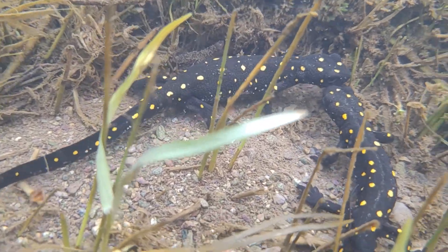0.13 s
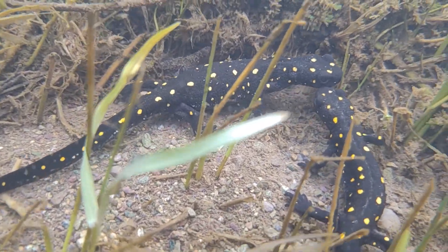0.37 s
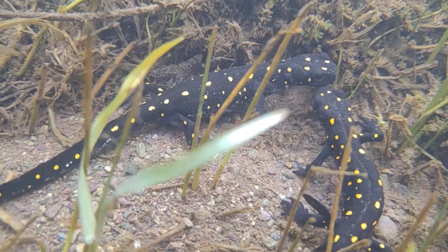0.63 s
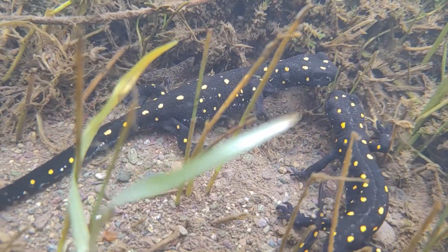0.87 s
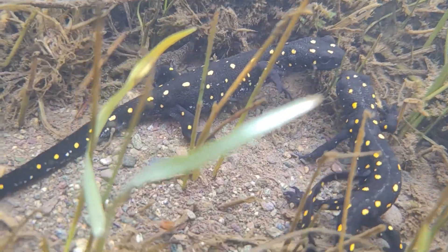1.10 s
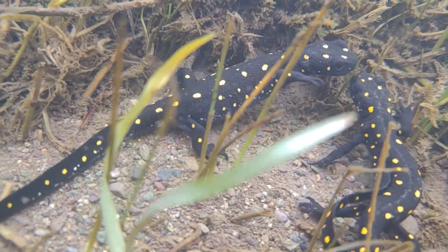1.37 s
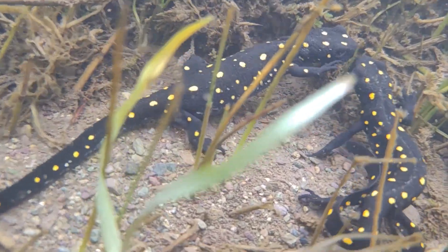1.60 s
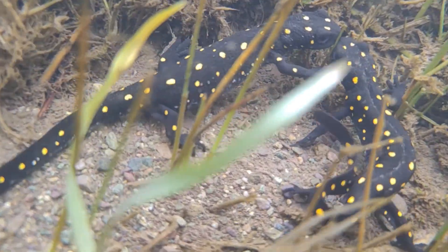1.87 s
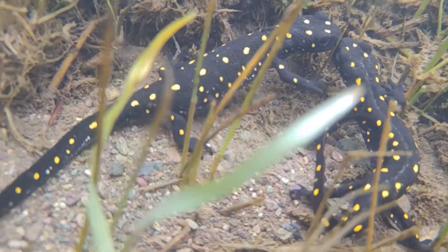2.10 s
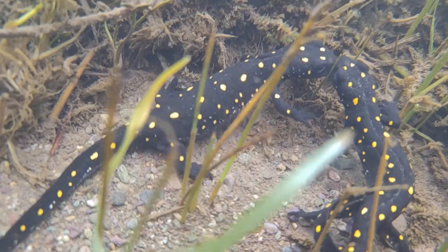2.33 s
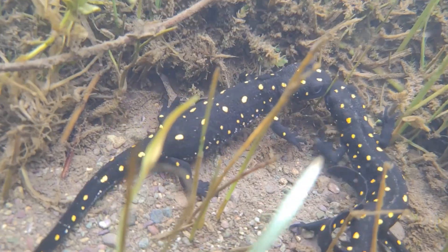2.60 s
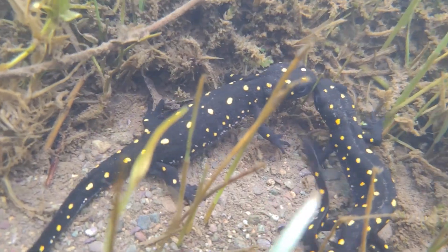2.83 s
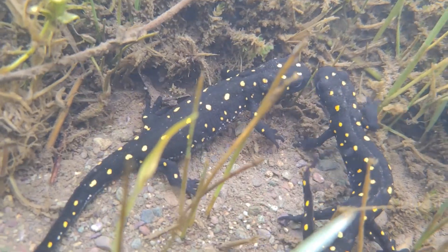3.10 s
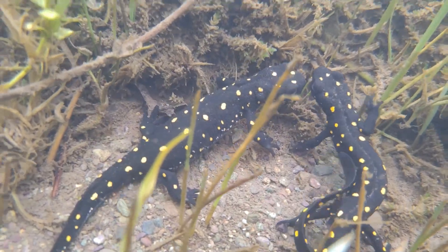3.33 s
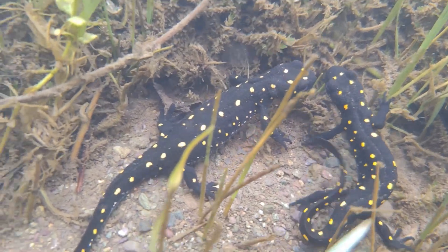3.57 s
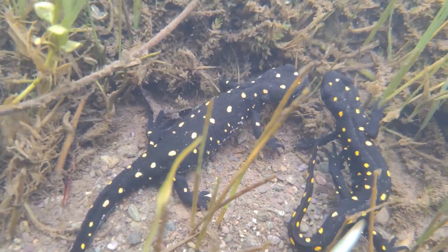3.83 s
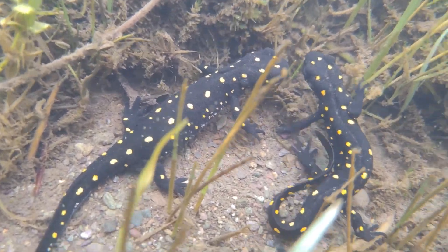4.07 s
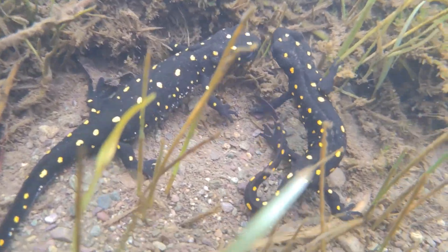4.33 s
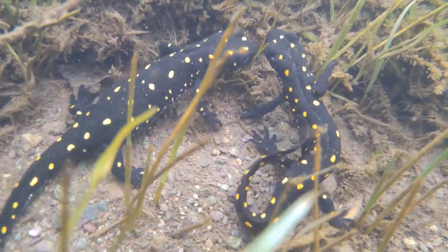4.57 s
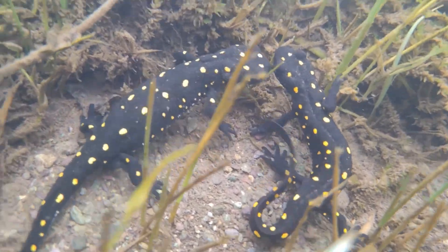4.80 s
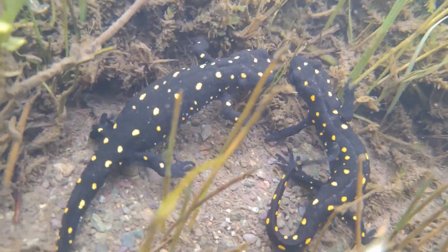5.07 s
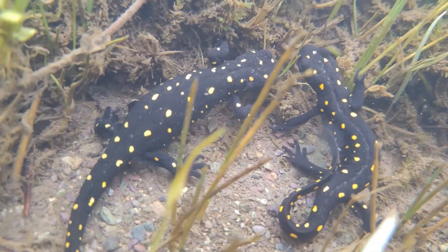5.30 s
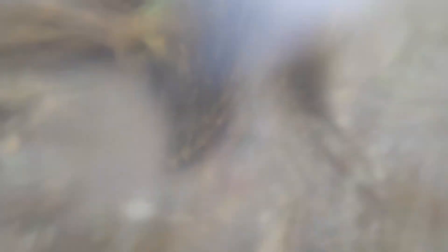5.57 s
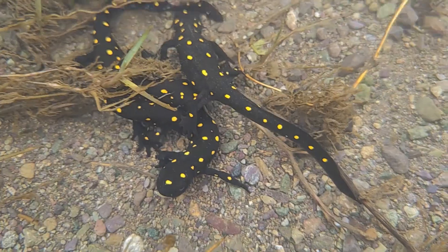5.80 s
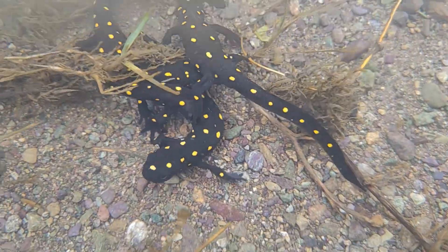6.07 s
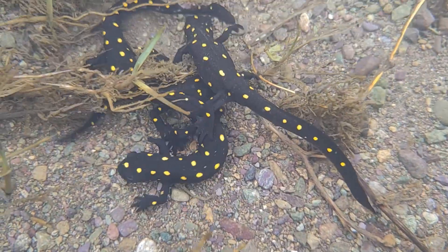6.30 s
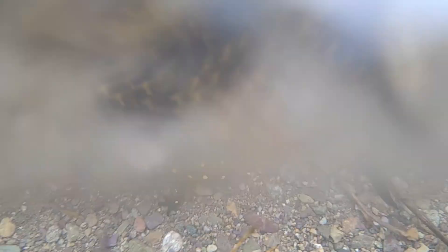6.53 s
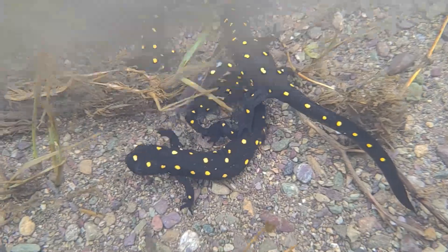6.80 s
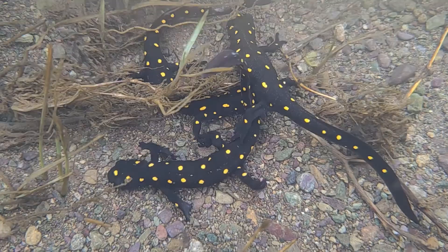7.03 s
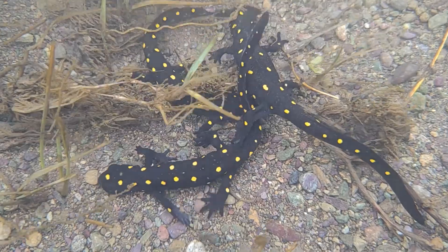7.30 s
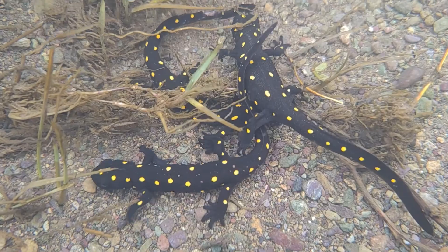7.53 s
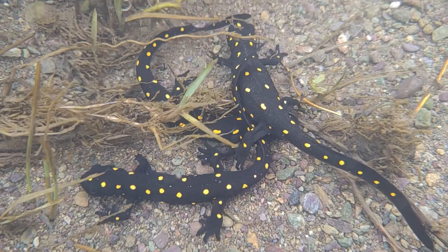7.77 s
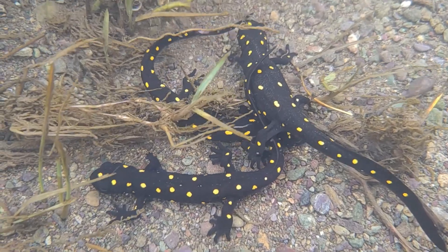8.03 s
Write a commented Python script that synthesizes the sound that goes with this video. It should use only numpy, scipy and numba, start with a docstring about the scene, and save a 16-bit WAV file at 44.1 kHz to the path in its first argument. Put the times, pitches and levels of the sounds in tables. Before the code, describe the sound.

Two underwater passages, heard from inside a small casing in a stream. From 0 to 5.4 seconds it is muffled and dark: slow sloshing pressure, a rough wavering low hum swelling in irregular bumps, and very faint far water. Tiny grit ticks and light bubble pops scatter around 0.3 to 1.4; a hard clack with a knock lands at 1.7. After a quieter stretch, small pops and ticks gather at 3.2, faint weed brushing follows from 3.4, and the loudest sharp clacks and hollow knocks strike between 3.6 and 4.1. It then settles to hum and small blips. At 5.4 a quick fade through silence opens onto a brighter, steady, dense rush and hollow gurgle, surging near 6.2 and 7.0, with constant round bubble plops, crisp ticks and dull knocks. It eases slightly toward 8.1 seconds while a low wash grows from about 7.4.

```python
"""A small camera lies under a shallow stream, first deep in weed: the current slosh rocks its mount, two low
modes of which hum as noisy, wavering sines, over faint far water. Grit ticks on the casing, knocks ring the body,
a few bubbles pop as fading sines, and weed brushes past as filtered noise. After a short fade through silence
the camera lies just below the surface: a dense rush and gurgle of bubbles rings the casing, whose modes
reach the two microphones differently, while ticks, knocks and pops go on over a low wash."""
import sys
import numpy as np
from scipy import signal
from scipy.fft import rfft, irfft, next_fast_len
from scipy.io import wavfile
from scipy.ndimage import uniform_filter1d
from numba import njit

SR = 44100
rng = np.random.default_rng(int(sys.argv[2]) if len(sys.argv) > 2 else 0)


def wav_out(sig):
    """Save sig, one row per channel (or a flat mono array), as 16-bit PCM at SR to the path in sys.argv[1]."""
    wavfile.write(sys.argv[1], SR, np.round(np.clip(np.atleast_2d(sig).T, -1, 1) * 32767).astype(np.int16))


def ratio(d):
    """dB to gain"""
    e = np.asarray(d, float) / 20
    return 10 ** e


N = 359415
TIME_S = np.arange(N) / SR

# Strength of the shallow flow past the casing. Each row: time in seconds, level of the rush in dB.
FLOW = [(5.45, -34), (5.62, -33), (5.8, -36), (6.05, -34.5), (6.15, -30.5), (6.2, -38), (6.3, -35),
        (6.43, -39), (6.66, -37.5), (6.84, -38.5), (6.92, -32.5), (7.08, -33), (7.3, -34), (7.52, -37),
        (7.8, -38.5), (7.97, -37), (8.15, -40.5)]
# Casing resonances. Each row: frequency in Hz, width in Hz, left gain in dB, right gain in dB,
# lag of the right microphone in radians.
CASING_MODES = [(304, 280, -17, -0.5, 0.93), (477, 73, 4, 5.5, -0.13), (600, 170, 8.5, 3, 0.05),
                (944, 140, -1.5, 5.5, -2.5), (1150, 30, -5, 5, 2.5), (1450, 130, -1, -2.5, -0.5),
                (1860, 250, -17, 4.5, 0.32), (2120, 340, -11.5, 4.5, 0.21), (2648, 170, 6.5, 1, -1.5),
                (3460, 2500, -6.5, -8.5, 4), (4000, 51, 4.5, 0, 4), (4830, 180, 2.5, -15, 1.5),
                (5315, 240, 3.5, -5, 2), (6090, 110, -10.5, 9, 5), (6800, 1300, -1, 9.5, 3.5)]
# Spectrum of the far murmur. Each row: frequency in Hz, relative level in dB.
MURMUR_COLOUR = [(170, -10.5), (240, -1.5), (330, -4), (450, -1), (570, 3.5), (680, -7), (800, -15.5),
                 (1100, -35.5)]
# Spectrum of the far fizz before the casing. Each row: frequency in Hz, relative level in dB.
FIZZ_COLOUR = [(600, -14), (850, -3), (1150, -8), (1480, -4), (1800, -13.5), (3200, -8), (6800, -23.5),
               (8000, -47.5), (9500, -30.5), (12200, -15.5), (15500, -35.5)]
# Spectrum of the gurgle before the casing. Each row: frequency in Hz, relative level in dB.
GURGLE_COLOUR = [(250, -6.5), (400, -2.5), (520, -0.5), (700, -4.5), (1000, -7), (1400, -36)]
# Spectrum of the rush before the casing. Each row: frequency in Hz, relative level in dB.
RUSH_COLOUR = [(600, 1), (900, -10.5), (1200, -11.5), (1500, -12.5), (2100, -2.5), (3200, -9.5),
               (5400, -15), (7000, -27.5), (8300, -54), (9700, -34.5), (12000, -31.5), (15500, -44)]
# Spectrum of the low wash. Each row: frequency in Hz, relative level in dB.
WASH_COLOUR = [(40, -14), (70, -3.5), (130, -8), (250, -5), (400, -14.5), (600, -36.5)]
# Spectrum of the deep slosh. Each row: frequency in Hz, relative level in dB.
SLOSH_COLOUR = [(4, -30.5), (8, 14), (18, -4), (28, -8), (50, -6), (75, -6.5), (130, -19), (250, -47.5)]
# Spectrum of the shallow swell. Each row: frequency in Hz, relative level in dB.
SWELL_COLOUR = [(4, -28.5), (8, 9), (22, 6.5), (38, -11.5), (70, -15.5), (130, -37.5), (250, -42.5)]
# Spectrum of the noise that roughens the sway. Each row: frequency in Hz, relative level in dB.
RUMBLE_COLOUR = [(45, -19), (70, -3.5), (95, 2.5), (125, 0), (150, -18.5), (230, -28)]
# Looseness of the mount around its upper mode. Each row: frequency in Hz, relative level in dB.
RATTLE_COLOUR = [(135, -25), (160, -1), (185, 1), (215, -5.5), (250, -16), (300, -27.5)]
# Spectrum of the weed strokes before the casing. Each row: frequency in Hz, relative level in dB.
BRUSHING_COLOUR = [(900, -36), (1500, -4), (2500, 0), (3400, -9), (6000, -20.5), (7500, -33.5)]
# Spectrum of the crack of a tick. Each row: frequency in Hz, relative level in dB.
CRACK_COLOUR = [(6000, -12.5), (7500, 0), (9000, -16.5), (12000, 3), (15000, -7.5), (16200, -21)]
# Grit on the casing. Each row: start in seconds, peak of the ring before panning in dB, centre in Hz,
# crack over that peak in dB, left minus right in dB.
TICKS = [(0.2793, -38.5, 2580, -14.5, -7), (.29, -45.5, 6800, -36, -6), (0.509, -45, 5970, -27, -5),
         (.633, -51, 6800, -33, -11), (.668, -44.5, 3900, -40, -8), (.9697, -51, 3850, -46, 2),
         (.985, -54.5, 2650, -45, 0), (1.062, -54, 4410, -48, 0), (1.073, -56, 4700, -46, 0),
         (1.085, -53, 4194, -45, 0), (1.168, -45, 2620, -45, -2), (1.281, -52, 2580, -45, 0),
         (1.297, -43, 2514, -45, 5), (1.3479, -54.5, 3600, -45, 0), (1.3653, -50.5, 2600, -45, 2),
         (1.706, -28, 3460, -40, 2), (1.727, -16.5, 2760, -38, -6), (1.731, -11, 1730, -49.5, 0.5),
         (1.878, -43.5, 6800, -19.5, -6.5), (2.45, -51, 2050, -39.5, 3.5), (3.093, -41.5, 4470, -8.5, -5),
         (3.185, -42.5, 2652, -41, -6.5), (3.202, -35, 1388, -38, -5.5), (3.272, -47.5, 6546, -18, -8),
         (3.6392, -26, 3043, -2, -5), (3.6845, -2, 2620, -67.5, -2.5), (3.8005, -16, 1086, -25.5, -2),
         (3.8578, -21, 2120, -32.5, 1), (3.9507, -16, 2862, -6, -6.5), (3.958, -14, 5530, -15, -6.5),
         (4.108, -5, 2120, -68, -3.5), (4.395, -47, 4250, -32, -4), (4.481, -49, 7000, -27.5, -9.5),
         (4.556, -34.5, 2300, -47, -5.5), (4.62, -55, 4495, -32, 1), (4.705, -51, 3890, -34.5, 0),
         (5.066, -55, 5000, -37, -3), (5.15, -46, 5184, 2.5, -1), (5.1736, -52.5, 4000, -3, -11.5),
         (5.471, -19, 2290, -19, 11), (5.5631, -27, 3830, -40, 5), (5.6349, -22.5, 2100, -44, 5),
         (5.6747, -28.5, 3910, -34.5, 1), (5.7806, -32, 3860, -40, 0), (5.7, -30, 5500, -39, -12),
         (5.8799, -30.5, 5340, -29, 0), (5.9327, -21, 2100, -45, 0), (6.005, -24, 4500, -26, 7),
         (6.0056, -19.5, 2350, -45, -5), (6.1093, -24, 4540, -38, 0), (6.1476, -21, 2270, -45, -4),
         (6.1665, -22, 2730, -40, 0), (6.2326, -24.5, 3570, -23.5, 2), (6.3003, -22, 4060, -28.5, 3.5),
         (6.284, -18.5, 1810, -24, 6), (6.328, -11.5, 1860, -45, 11.5), (6.4347, -20.5, 2130, -48, -6),
         (6.559, -31, 5720, -14, -8), (6.8494, -25.5, 4010, -42, 4), (6.8985, -19, 2120, -45, -2),
         (6.956, -26, 3670, -40, 7), (7.0073, -24.5, 4990, -40, 3), (7.008, -22.5, 2300, -37, -3),
         (7.0826, -28, 4640, -40, 2), (7.0996, -30.5, 4960, -42, 0), (7.116, -25, 4960, -40, 2),
         (7.13, -51, 5400, -8, -14), (7.1446, -22.5, 2210, -40, 0), (7.2298, -29, 4010, -40, 0),
         (7.473, -17, 2880, -25, 1), (7.487, -18.5, 4130, -44, 1), (7.585, -25.5, 4000, -22, 6),
         (7.633, -20, 1860, -20, 16), (7.634, -17, 5930, -28, -7.5), (7.718, -34.5, 5000, -12, -13),
         (7.935, -27.5, 3100, -40, 8), (7.9751, -23, 2170, -44, -1), (3.801, -26, 2310, -25, -1),
         (4.1085, -13.5, 2630, -40.5, 0), (1.7068, -34, 5000, -29.5, -1)]
# Modes of the camera body. Each row: nominal frequency in Hz, time to fall 60 dB in seconds, left minus right in dB.
BODY_MODES = [(126, 0.058, 1), (169, 0.071, -3), (214, 0.045, 0.2), (261.6, 0.074, 1.1), (288, 0.11, -5),
              (328.6, 0.071, -12), (385, 0.15, 6), (565, 0.039, 13), (694, 0.11, 5), (844, 0.036, 4)]
# Knocks on the body. Each row: start in seconds, level of a mode at the blow's pitch in dB, that pitch in Hz.
THUDS = [(0.279, -49, 249), (.51, -46, 350), (1.432, -45, 199.1), (1.728, -23, 524.4), (2.225, -39, 560),
         (2.615, -51, 539.3), (3.201, -32.5, 600), (3.649, -33.5, 254), (3.688, -26.5, 385),
         (3.689, -28, 694), (3.69, -30, 265), (3.956, -36, 560), (3.8, -16.5, 565), (3.955, -33, 385),
         (3.965, -18, 188), (4.109, -22.5, 565), (5.473, -19, 246), (5.775, -28.5, 126), (5.821, -35, 126),
         (6.284, -32.5, 250), (6.326, -21, 326), (6.721, -32.5, 252), (7.009, -30, 258), (7.569, -26, 224),
         (7.634, -27, 315), (7.995, -26, 167), (8.045, -22, 167), (8.082, -32, 171)]
# Single bubbles. Each row: start in seconds, level before fading and panning in dB, pitch in Hz,
# left minus right in dB, pitch slide as a share.
POPS = [(.5437, -44, 1480, -4, .05), (.555, -50.5, 910, 10, 0.079), (.562, -50, 1130, 2, 0),
        (.6, -49, 1450, -6, 0.068), (0.6092, -35, 1060, 5.5, .16), (.638, -49, 970, 5, 0),
        (.66, -39, 1050, 4, 0.033), (0.6782, -36.5, 2720, 5, -0.061), (.69, -48, 904, 6, .2),
        (.738, -43.5, 1068, 1, 0.098), (.745, -52, 944, 7, -0.00055), (.752, -50, 1450, -5, 0),
        (.7866, -52, 1540, -12.5, -0.022), (1.13, -51, 1025, 2, 0), (1.5678, -39, 2460, -11, -.041),
        (1.878, -36.5, 1877, -10, 0.11), (1.879, -38, 2570, 6, -0.001), (2.793, -45.5, 2000, -8.5, 0.033),
        (2.8808, -51, 1451, -12, -.036), (3.203, -32.5, 1342, -12, 0.079), (3.205, -38.5, 900, 7, .15),
        (3.224, -47, 1450, -6, 0.027), (3.228, -43, 987, 6, .15), (3.281, -40, 1133, 5, .1),
        (3.321, -47, 1380, -3, 0), (3.2725, -36.5, 1226, 6, .13), (3.2804, -31.5, 1503, -3, -0.14),
        (3.2984, -38.5, 1090, 4, -.05), (3.299, -39.5, 2260, -7.5, 0), (4.053, -51, 1051, 3, -0.037),
        (4.3524, -44, 2120, -9, -0.057), (4.397, -46.5, 1860, -11.5, 0.0076),
        (4.466, -35.5, 2196, -9, 0.005), (4.558, -32.5, 2427, -11, 0.025),
        (4.7189, -40.5, 1450, -10, -0.019), (4.722, -46.5, 960, 12, 0.009),
        (4.7716, -41, 1830, -13, -0.0066), (5.06, -52.5, 2401, 13, -.05), (5.149, -33, 2640, -5, -0.01),
        (5.444, -19.5, 541, 2, 0.054), (5.471, -20.5, 503, 14, 0.098), (5.527, -24, 532, 6, 0.012),
        (5.705, -15.5, 504.2, 6, 0.059), (5.548, -26, 498, 3, 0.00094), (5.629, -29, 531, 4, -0.015),
        (5.668, -26, 560, 4, .03), (5.747, -19.5, 615, 1, 0.016), (5.788, -23.5, 493, 4, 0.053),
        (5.92, -25.5, 500, 4, .05), (5.949, -29, 527, 4, 0.079), (5.97, -25, 392, 0, 0.085),
        (5.985, -20.5, 530, 4, 0.022), (6.02, -23.5, 576, 5, 0.0039), (6.079, -26, 500, 7, .03),
        (6.125, -21, 517, 5, 0.024), (6.151, -17, 494, 3, 0.071), (6.242, -18.5, 508, 5, -0.08),
        (6.382, -29, 503, 3, -0.012), (6.427, -27.5, 469, 4, .03), (6.508, -20, 517, 1, .04),
        (6.5085, -22, 1692, 7.5, .02), (6.636, -22, 480, -3, 0.038), (6.6388, -21.5, 1150, 11, 0.022),
        (6.658, -23.5, 2670, -7.5, 0.021), (6.6859, -20.5, 1149, -16.5, -0.15),
        (6.7161, -26, 1830, -16.5, 0.11), (6.784, -25, 494, -1, -0.0034), (6.881, -18.5, 501, 5, 0.068),
        (6.9, -28.5, 906, 10, -0.013), (6.908, -26.5, 1274, 7, 0.096), (6.959, -29, 500, 2, 0.072),
        (6.996, -13.5, 510, -2, .04), (7.115, -24.5, 460, 3, 0.032), (7.167, -18.5, 489, 5, .025),
        (7.306, -28, 555, 7, 0.0081), (7.327, -24, 534, 12.5, 0.013), (7.399, -30.5, 506, 3, .03),
        (7.429, -25, 560, 0, .04), (7.458, -22, 512, 0, 0.021), (7.695, -28.5, 719, 3, -0.000063),
        (7.808, -31, 515, -3, 0.016), (7.859, -30, 600, 3, .03), (7.88, -23, 505, 1, -0.03),
        (7.906, -20, 640, 4.5, -0.0013), (7.969, -20, 628, 8, 0.043), (8.0237, -25, 1350, -2, 0.00067),
        (8.04, -32, 1200, 2, 0.22), (8.0471, -25, 1510, -10.5, .29)]
# Eddies that jolt the mount. Each row: time in seconds, peak gain of the sway in dB, sway pitch in Hz.
JOLTS = [(0.303, -21, 80), (0.403, -23, 91.5), (0.501, -22, 91.9), (0.864, -19.5, 87.8), (0.962, -20, 89),
         (1.058, -24, 88.15), (1.449, -18.5, 85.25), (1.519, -24.5, 87.04), (1.758, -11.5, 91.5),
         (1.862, -18.5, 92.2), (1.932, -25, 91), (2.013, -20.5, 93.2), (2.206, -27, 89.3),
         (2.259, -16, 85.3), (2.375, -28, 88.84), (2.438, -24.5, 89.56), (2.55, -29.5, 91.5),
         (2.624, -19, 85.8), (2.744, -22, 93.4), (2.879, -26.5, 97.1), (2.931, -21.5, 101.1),
         (3.1, -29.5, 100.2), (3.207, -27.5, 98.5), (3.278, -24, 97.38), (3.716, -14, 104.7),
         (3.773, -18.5, 107.2), (3.811, -21.5, 104.2), (3.863, -26.5, 104.5), (3.971, -23, 105.6),
         (4.141, -30, 104.2), (4.416, -19, 104.0), (4.498, -16, 104.4), (4.685, -28, 98.76),
         (4.9, -27, 99.3), (5.186, -25.5, 93.74), (5.236, -27, 95.7), (5.377, -22.5, 105.8)]
# Eddies that twist the mount and ring its upper mode. Each row: time in seconds, peak gain in dB.
TWISTS = [(0.3, -43), (0.561, -41.5), (0.7, -43), (1.431, -47.5), (1.73, -30), (1.816, -41), (2.231, -41.5),
          (3.013, -35.5), (3.141, -36.5), (3.408, -43.5), (3.498, -36), (3.664, -23), (3.703, -21.5),
          (3.841, -30.5), (3.881, -50), (3.981, -28.5), (4.056, -32), (4.202, -45.5), (4.408, -33.5),
          (4.49, -33.5), (4.895, -42), (5.094, -42.5), (5.386, -32.5)]
# Slow surges of water against the camera. Each row: time in seconds, peak in dB before SURGE_GAIN_DB.
SURGES = [(0.056, -22.5), (0.406, -20.5), (0.674, -19), (1.157, -21.5), (1.375, -18.5), (1.728, -17.5),
          (1.948, -19), (2.219, -23), (2.377, -22), (2.574, -29), (2.756, -24.5), (3.179, -19),
          (3.458, -23), (3.594, -24.5), (3.915, -25.5), (4.21, -27.5), (4.49, -22.5), (4.653, -21),
          (5.252, -26.5), (5.476, -30), (5.607, -32), (5.777, -28), (5.952, -33.5), (6.276, -34),
          (6.777, -40.5), (6.948, -35.5), (7.172, -33), (7.327, -41), (7.507, -37), (7.802, -41),
          (8.05, -32)]
# Strokes of weed over the casing. Each row: time in seconds, peak gain in dB, length in seconds.
STROKES = [(3.43, -57, .25), (3.539, -55.5, 0.29), (3.769, -62, .15), (3.891, -56, 0.18)]

CUT_S, FADE_OUT_S, FADE_IN_S = 5.424, 0.044, 0.036
BETWEEN_DB = -4  # casing gain between its modes
CLUMP_DB, CLUMPS_PER_S = 3.5, 45  # bubbles crowd together and thin out
SWARM_RISE_CYCLES = 2.5
SURGE_RISE_S, SURGE_FALL_S, SURGE_GAIN_DB = 0.042, 0.04, 2
SLOSH_REST_DB, SWELL_REST_DB = -27.5, -42  # deep, shallow
FIZZ_DB, FIZZ_WIDTH = -64.5, 0.89  # width 1 leaves the two sides as they are
MURMUR_DB, MURMUR_UNDER_TWIST_DB = -56.5, -21  # at rest; over the gain of the twist
MOTTLE_DB = -17  # far low bubbles against the smooth murmur
FLEX_HZ, FLEX_WIDTH_HZ = 560, 290  # here the casing bends and pushes the two microphones in opposite ways
WASH_DB, WASH_GROWS_S, WASH_GAIN_DB = -49, 7.35, 5.5
SMOOTH_SCRATCH, SCRATCH_PER_CRACK = 0.38, 4.4
NOTE_DB, NOTE_S, NOTE_LAG_RAD = -7, 0.0035, 1.4
RING_AT_1K_S, RING_SLOPE = 0.061, 0.44  # smaller, higher bubbles die sooner
RISE_AT_1K_S, RISE_SLOPE = 0.0012, 1.7  # larger ones neck off more slowly
TRAIL_DB, POP_LAG_S = -13, 0.00024
UPPER_HZ = 177.6
JOLT_RISE_S, JOLT_FALL_S, SWAY_REST_DB, SWAY_WANDER_DB = 0.015, 0.024, -35.5, 2.5
TWIST_RISE_S, TWIST_FALL_S, UPPER_REST_DB, UPPER_WANDER_DB = 0.0078, 0.033, -55, 1.5
TIGHTENS_S, TIGHT_GAIN_DB = 2.98, 9  # the mount tightens and its upper mode carries more at rest
GURGLE_PIVOT_DB = -36  # here gurgle and flow are level
GURGLE_FOLLOWS = 0.67  # dB of gurgle for each dB of flow


def colour(hz, table):
    """Spectral weighting: gain interpolated in dB over log frequency, closed at both ends."""
    f, db = np.transpose(table)
    return ratio(np.interp(np.log(hz + 1e-3), np.log(f), db, left=-120, right=-120))


def unit(x):
    """Normalisation: scale to rms 1."""
    return x / np.sqrt(np.mean(x ** 2))


def walk(rate):
    """Random modulation: levels held 1 / rate seconds and slewed twice, spread near 1."""
    k = int(SR / rate)
    held = np.repeat(rng.standard_normal(N // k + 1), k)
    return 1.3 * uniform_filter1d(uniform_filter1d(held, k), k)[:N]


def noise(shared):
    """Partial coherence: two noises that have this share of their power in common."""
    common, *own = rng.standard_normal((3, N))
    return np.sqrt(shared) * common + np.sqrt(1 - shared) * np.array(own)


def tint(x, table):
    """Linear filtering: shape the spectrum, then scale to rms 1."""
    size = next_fast_len(N)
    f = np.arange(size // 2 + 1) * SR / size
    return unit(irfft(rfft(x, size) * colour(f, table), size)[..., :N])


def casing(x, table):
    """Modal resonance: a coloured drive rings the casing modes, each stronger at one microphone."""
    size = next_fast_len(x.shape[-1])
    f = np.arange(size // 2 + 1) * SR / size
    gain = np.full((2, len(f)), ratio(BETWEEN_DB), complex)
    for hz, width, left_db, right_db, lag in CASING_MODES:
        mode = 1j * f * width / (hz ** 2 - f ** 2 + 1j * f * width)
        gain += np.array([[ratio(left_db)], [ratio(right_db) * np.exp(-1j * lag)]]) * mode
    return irfft(rfft(x, size) * colour(f, table) * gain, size)[..., :x.shape[-1]]


def swells(s, peak_db, rise_s, fall_s, rest_db):
    """Power addition: a rest level plus events, each with a bell-shaped rise and a dying fall."""
    t = np.arange(0, N, 32) / SR
    late = t - np.array(s)[:, None]
    rise = np.minimum(late, 0) / np.reshape(rise_s, (-1, 1))
    fall = np.maximum(late, 0) / np.reshape(fall_s, (-1, 1))
    shape = np.exp(-rise ** 2 - 2 * fall ** 2 / (1 + fall))
    power = (ratio(2 * np.array(peak_db))[:, None] * shape).sum(axis=0)
    return np.sqrt(np.interp(TIME_S, t, power) + ratio(2 * rest_db))


def surges(rest_db):
    """Slow flow pressure: the gain of the surges over a rest level."""
    s, db = np.transpose(SURGES)
    return swells(s, db + SURGE_GAIN_DB, SURGE_RISE_S, SURGE_FALL_S, rest_db)


@njit
def bubbles(start, hz, ring_s, left, right, glide, rise_s):
    """Damped oscillation: sines that swell briefly, fall 60 dB in ring_s and slide in pitch over its first half."""
    out = np.zeros((2, N))
    for k in range(len(start)):
        n = int(ring_s[k] * SR)
        fade, phase, size = 1000. ** (-1. / (ring_s[k] * SR)), 0., 1.
        for i in range(min(n, N - start[k])):
            phase += 2 * np.pi * hz[k] * (1 + glide[k] * min(2. * i / n, 1.)) / SR
            size *= fade
            v = size * np.sin(phase) * min(1., i / (rise_s[k] * SR))
            out[0, start[k] + i] += left[k] * v
            out[1, start[k] + i] += right[k] * v
    return out


def swarm(count, lo_hz, hi_hz, cycles, spread_db, shared):
    """Superposition: many random damped sines in clumps, each with its own pitch, size and side."""
    crowd = np.cumsum(ratio(CLUMP_DB * walk(CLUMPS_PER_S)))
    u, side = rng.random((count, 3)).T, rng.standard_normal((count, 3)).T
    start = np.searchsorted(crowd, u[0] * crowd[-1])
    hz = lo_hz * (hi_hz / lo_hz) ** u[1]
    size = ratio(-spread_db * np.log(u[2] + 1e-4)) * np.sqrt(hz / lo_hz)
    left, right = size * (np.sqrt(shared) * np.sign(side[0]) + np.sqrt(1 - shared) * side[1:])
    return unit(bubbles(start, hz, cycles / hz, left, right, 0.21 + 0 * hz, SWARM_RISE_CYCLES / hz))


def water(table, grains, grain_db, shared, flicker_db):
    """Resonant transmission: flickering flow noise and bubble grains heard through the casing."""
    flow = noise(shared) * ratio(flicker_db * walk(12))
    return unit(casing(flow + ratio(grain_db) * grains, table))


def far_fizz():
    """Bubble superposition: faint small bubbles and flow noise drive the casing."""
    grains = swarm(count=6000, lo_hz=900, hi_hz=7000, cycles=61, spread_db=2.5, shared=0.74)
    fizz = water(FIZZ_COLOUR, grains, grain_db=-5.5, shared=0.13, flicker_db=1.0)
    fizz = unit(FIZZ_WIDTH * fizz + (1 - FIZZ_WIDTH) * fizz.mean(axis=0))
    return ratio(FIZZ_DB + 1.2 * walk(5)) * fizz


def far_murmur(twist):
    """Flexural antiphase: the murmur bends the casing in one band, and a twist stirs it up."""
    mottle = swarm(count=900, lo_hz=230, hi_hz=759, cycles=45, spread_db=1.5, shared=0.62)
    left, right = tint(noise(0.62) + ratio(MOTTLE_DB) * mottle, MURMUR_COLOUR)
    flex = signal.iirpeak(FLEX_HZ, FLEX_WIDTH_HZ and FLEX_HZ / FLEX_WIDTH_HZ, fs=SR)
    right = right - 2 * signal.lfilter(*flex, right)  # turns the band over
    rest = ratio(MURMUR_DB + 1.4 * walk(3.7))
    stirred = ratio(MURMUR_UNDER_TWIST_DB) * uniform_filter1d(twist, size=3000)
    return np.hypot(rest, stirred) * np.array([1.34 * left, 0.8 * right])


def low_wash():
    """Filtered turbulence: low noise that grows late, with slow swells below it."""
    growth = np.clip((TIME_S - WASH_GROWS_S) / 0.15, 0, 1)
    wash = ratio(WASH_DB + WASH_GAIN_DB * growth + 3 * walk(14)) * tint(noise(0.92), WASH_COLOUR)
    swell = surges(SWELL_REST_DB) * ratio(2.7 * walk(25)) * tint(noise(0.97), SWELL_COLOUR)
    return wash + swell


def weed():
    """Friction noise: strokes of weed swell and fade as flickering noise through the casing."""
    s, db, length_s = np.transpose(STROKES)
    stroke = swells(s, db, length_s / 4, length_s / 4, -120)
    return stroke * ratio(3.1 * walk(60)) * unit(casing(noise(0.65), BRUSHING_COLOUR))


def thuds():
    """Modal excitation: a knock rings most the body modes nearest the blow's own pitch."""
    s, db, centre = np.array(THUDS, float).T[:, :, None]
    hz, ring_s, pan_db = np.array(BODY_MODES, float).T[:, None]
    chance = rng.standard_normal((len(THUDS), 2, len(BODY_MODES)))
    db = db - 38 * abs(np.log2(hz / centre)) + 2 * chance[:, 0]
    bend = np.where(hz > 450, -1., 1.)  # upper modes bend the casing, opposite at the two microphones
    s, hz, ring_s = s + 0 * db, hz * (1 + 0.02 * chance[:, 1]), ring_s + 0 * db
    left, right = ratio(db + pan_db / 2), bend * ratio(db - pan_db / 2)
    rows = (s * SR).astype(int), hz, ring_s, left, right, 0 * hz, 0.35 / hz
    return bubbles(*(r.ravel() for r in rows))


def ticks():
    """Impact excitation: a grain rings the casing near its centre pitch; a scratchier one lasts longer and spreads."""
    size = 4096
    out, t = np.zeros((2, N + size)), np.arange(size) / SR
    f = np.arange(size // 2 + 1) * SR / size
    seal = signal.butter(6, 7300, fs=SR, output="sos")  # the port's membrane stops the ring's top
    edges = np.minimum(t / 0.0003, 1) * np.minimum((t[-1] - t) / 0.03, 1) ** 2
    lag = np.array([[0], [NOTE_LAG_RAD]])
    for (s, db, hz, crack_db, pan_db), chance in zip(TICKS, rng.standard_normal((len(TICKS), 3, size))):
        # the more it cracks, the rougher the grain
        scratch = np.clip(SMOOTH_SCRATCH + SCRATCH_PER_CRACK * ratio(crack_db), 0.1, 2)
        contact = np.exp(-t / (0.0024 + 0.0019 * scratch)) * (1 + 0.95 * np.exp(-t / 0.0008))
        contact = contact * np.minimum(t / 0.0002, 1)
        grain = chance[0] + 0.53 * chance[1:]
        # a faint slow part: the casing keeps shivering
        near = [(hz / 2, -40), (hz / 1.2, -22), (hz / 1.07, -6), (hz * 1.03, -6), (hz * 0.86, -22), (hz * 2, -40)]
        shiver = casing(ratio(-35) * np.exp(-t / 0.02) * grain, near)
        band = [(hz / 8, -40), (hz / 3, -8 - 8 / scratch), (hz / 1.08, -6 / scratch), (hz, 0),
                (hz * 1.23, -9 / scratch), (hz * 3, -14 - 14 / scratch)]
        knock = casing(contact * grain, band) * np.exp(-t / 0.016)
        # a smooth grain leaves a clear note
        note = np.sin(2 * np.pi * hz * t - lag) * np.exp(-t / NOTE_S)
        note = abs(knock).max(axis=1, keepdims=True) * note
        ring = knock + ratio(NOTE_DB) * SMOOTH_SCRATCH / scratch * note + shiver
        ring = signal.sosfilt(seal, ring * edges)
        burst = contact * np.exp(-t / 0.0037) * (chance[1:] + 0.51 * chance[0] * [[1], [-1]])
        crack = irfft(rfft(burst) * colour(f, CRACK_COLOUR), size) * edges
        both = ratio(db) * (ring / abs(ring).max() + ratio(crack_db) * crack / abs(crack).max())
        i = int(s * SR)
        out[:, i:i + size] += both * ratio(np.array([[pan_db], [-pan_db]]) / 2)
    return out[:, :N]


def pops():
    """Bubble resonance: each pop sheds two weaker neighbours and reaches the right microphone last."""
    s, db, hz, pan_db, glide = np.array(POPS, float).T
    ring_s = RING_AT_1K_S * (1000 / hz) ** RING_SLOPE
    rise_s = RISE_AT_1K_S * (1000 / hz) ** RISE_SLOPE
    u = rng.random((len(s), 4)).T
    s = np.concatenate([s, s + 0.0037 + 0.015 * u[0], s + 0.017 + 0.022 * u[1]])
    hz = np.concatenate([hz, hz * (0.85 + 0.15 * u[2]), hz * (1 + 0.14 * u[3])])
    db = np.concatenate([db, db + TRAIL_DB, db + 2 * TRAIL_DB])
    pan_db, ring_s, glide, rise_s = (np.tile(c, 3) for c in (pan_db, ring_s, glide, rise_s))
    start = (s * SR).astype(int)
    left, right = bubbles(start, hz, ring_s, ratio(db + pan_db / 2), ratio(db - pan_db / 2), glide, rise_s)
    return np.array([left, np.roll(right, int(POP_LAG_S * SR))])


def mount():
    """Forced vibration: eddies swell two wavering, rough low modes over slow sloshing; also gives the twist gain."""
    s, db, pitch = np.transpose(JOLTS)
    sway_hz = np.interp(TIME_S, s, pitch) * (1 + 0.029 * walk(30))
    jolt = swells(s, db, JOLT_RISE_S, JOLT_FALL_S, SWAY_REST_DB + SWAY_WANDER_DB * walk(22))
    rest_db = UPPER_REST_DB + TIGHT_GAIN_DB * (TIME_S > TIGHTENS_S) + UPPER_WANDER_DB * walk(16)
    twist = swells(*np.transpose(TWISTS), TWIST_RISE_S, TWIST_FALL_S, rest_db)
    tilt = np.array([[0.03], [-0.03]])  # rad: one microphone moves a little ahead
    sway = np.sin(2 * np.pi * np.cumsum(sway_hz) / SR + tilt) * (1 + 0.18 * walk(40))
    rocking = unit(sway) + ratio(-8.5) * tint(noise(0.99), RUMBLE_COLOUR)
    upper_hz = UPPER_HZ * (1 + 0.027 * walk(7.6) + 0.0297 * walk(50))
    upper = np.sin(2 * np.pi * np.cumsum(upper_hz) / SR + 3.5 * tilt) * (1 + 0.24 * walk(45))
    twisting = unit(unit(upper) + ratio(-4.5) * tint(noise(1.0), RATTLE_COLOUR))
    slosh = surges(SLOSH_REST_DB) * tint(noise(0.99), SLOSH_COLOUR)
    return jolt * rocking + twist * twisting + slosh, twist


def gurgle(flow_db):
    """Bubble superposition: larger, lower bubbles follow the flow by less than a dB for each dB."""
    level_db = GURGLE_PIVOT_DB + GURGLE_FOLLOWS * (flow_db - GURGLE_PIVOT_DB) + 1.1 * walk(18)
    grains = swarm(count=3000, lo_hz=301.3, hi_hz=1200, cycles=44.6, spread_db=0.0, shared=0.83)
    return ratio(level_db) * water(GURGLE_COLOUR, grains, grain_db=-9.5, shared=0.51, flicker_db=0.48)


def rush(flow_db):
    """Bubble superposition: a dense swarm rings the casing at the strength of the flow."""
    grains = swarm(count=15000, lo_hz=822.3, hi_hz=14320, cycles=48.0, spread_db=2.0, shared=0.14)
    dense = water(RUSH_COLOUR, grains, grain_db=-1.84, shared=0.18, flicker_db=0.78)
    # sparse small bubbles and sand grains stand out of the rush
    flecks = swarm(count=1500, lo_hz=1705, hi_hz=7000, cycles=66, spread_db=2.5, shared=0.2)
    sand = swarm(count=120, lo_hz=5000, hi_hz=11900, cycles=3.3, spread_db=-1.5, shared=0.25)
    sparse = unit(casing(flecks + ratio(-2.0) * sand, RUSH_COLOUR))
    return ratio(flow_db) * (dense + ratio(-12.5) * sparse)


def deep():
    """Superposition in the weed: mount hum over faint far water and a few strokes of weed."""
    hum, twist = mount()
    return far_fizz() + far_murmur(twist) + weed() + hum


def shallow():
    """Superposition near the surface: gurgle and rush share one flow, over a low wash."""
    flow_db = np.interp(TIME_S, *np.transpose(FLOW))
    return low_wash() + gurgle(flow_db) + rush(flow_db)


def scene():
    """Superposition in time: two places joined by a short fade through silence, with single events over both."""
    first = np.clip(np.minimum(TIME_S / 0.0013, (CUT_S - TIME_S) / FADE_OUT_S), 0, 1)
    second = np.clip((TIME_S - CUT_S) / FADE_IN_S, 0, 1) ** 2
    return first * deep() + second * shallow() + thuds() + ticks() + pops()


def top_cut(x):
    """Nothing passes above the cut-off."""
    return signal.sosfilt(signal.butter(12, 16480, fs=SR, output="sos"), x)


def record(dry):
    """Linear superposition is complete here: the finished mix is passed on whole."""
    return top_cut(dry)


dry = scene()
out = record(dry)
wav_out(out)
```